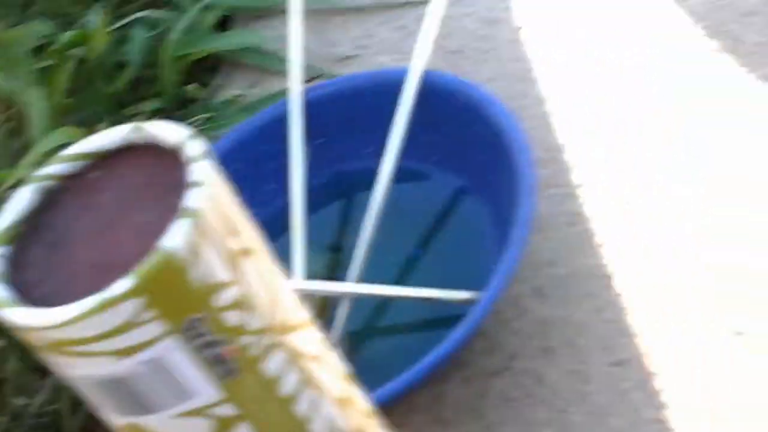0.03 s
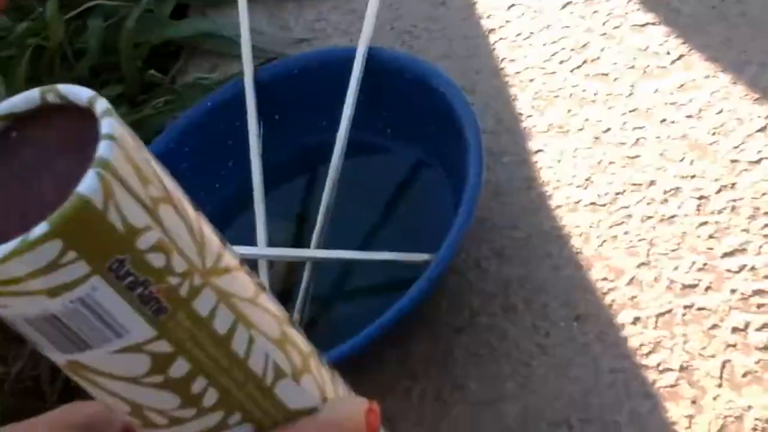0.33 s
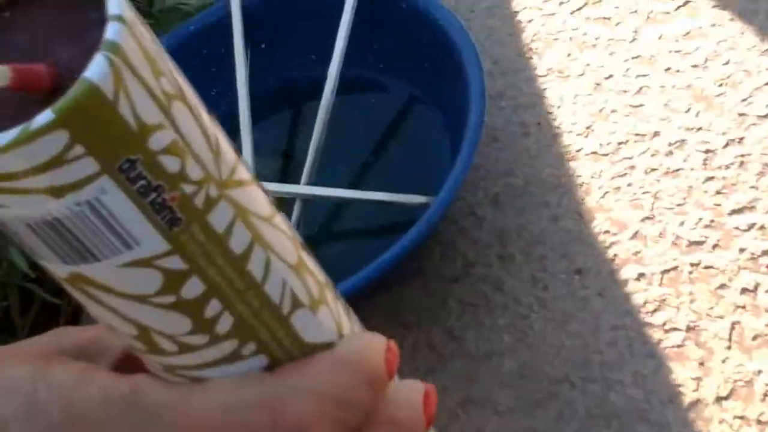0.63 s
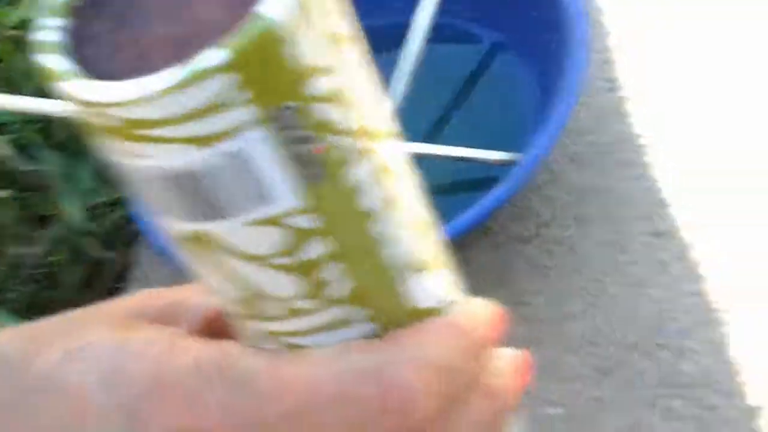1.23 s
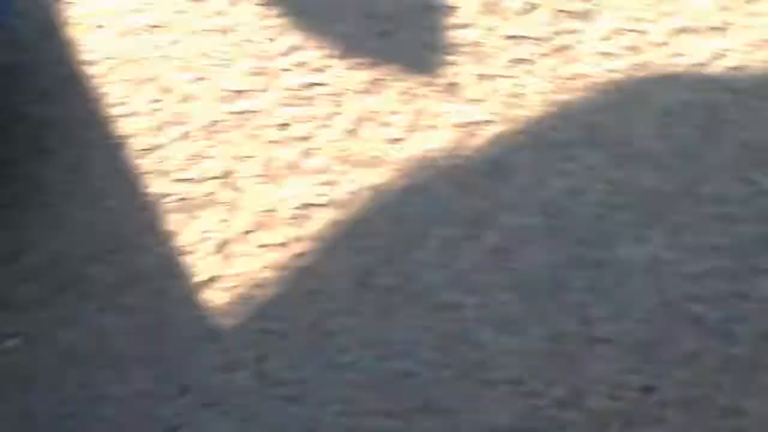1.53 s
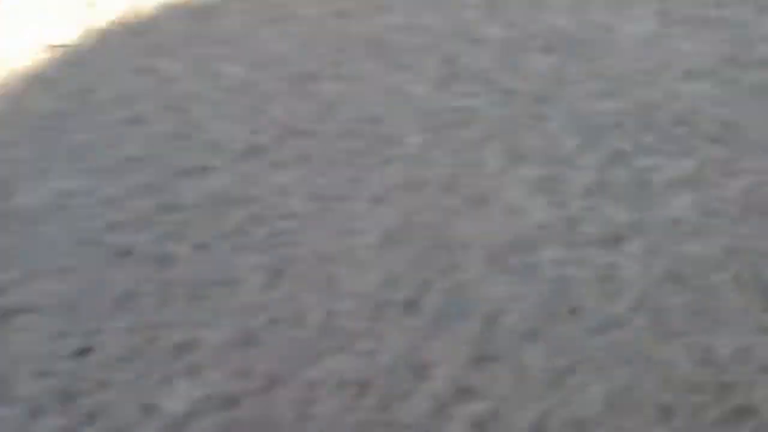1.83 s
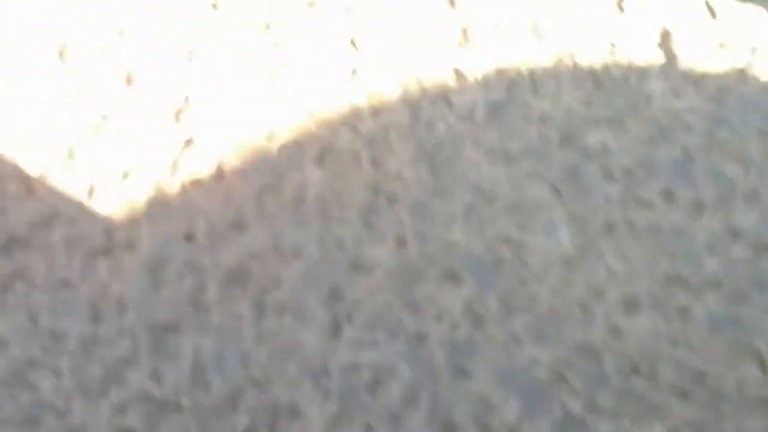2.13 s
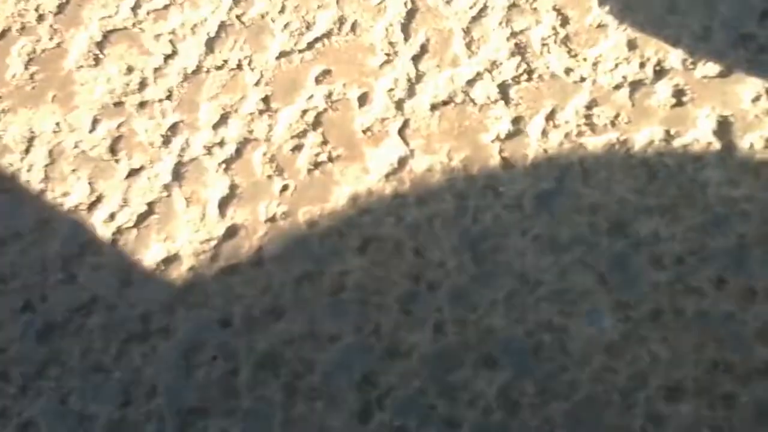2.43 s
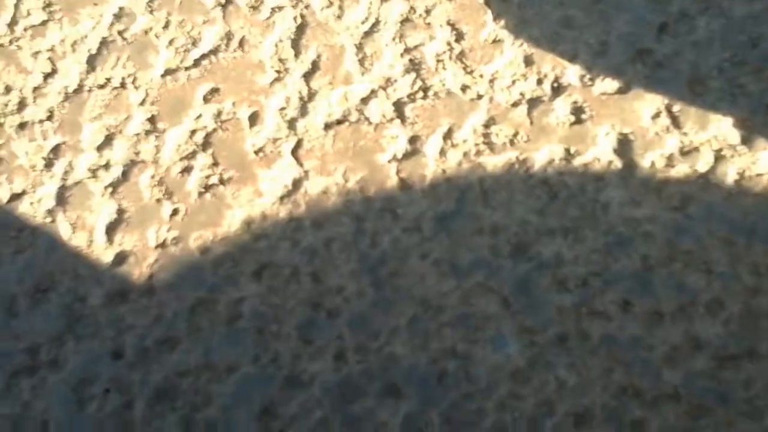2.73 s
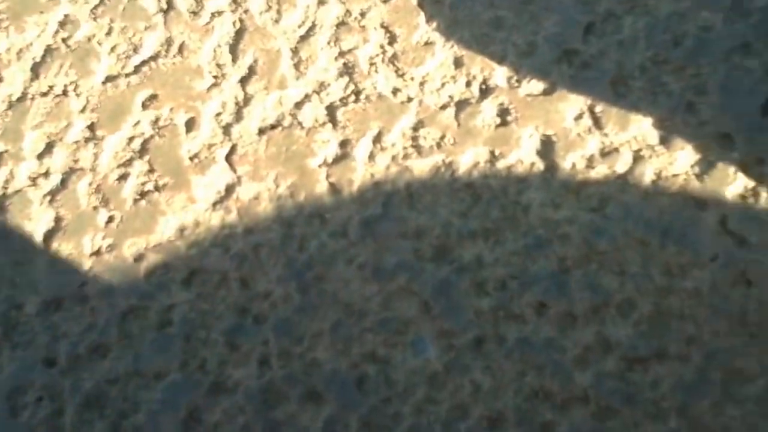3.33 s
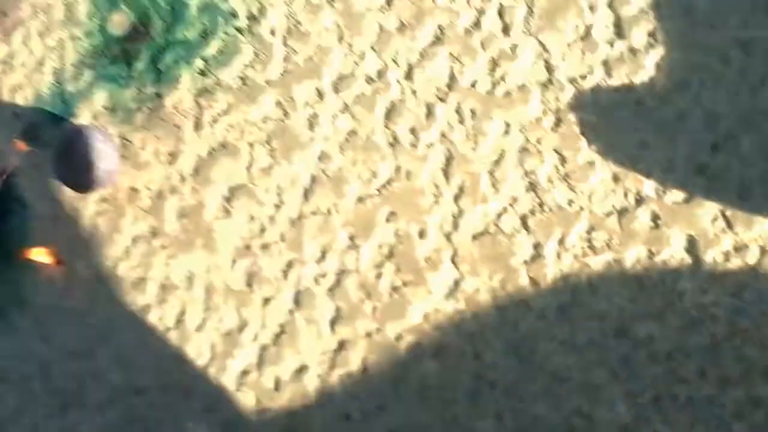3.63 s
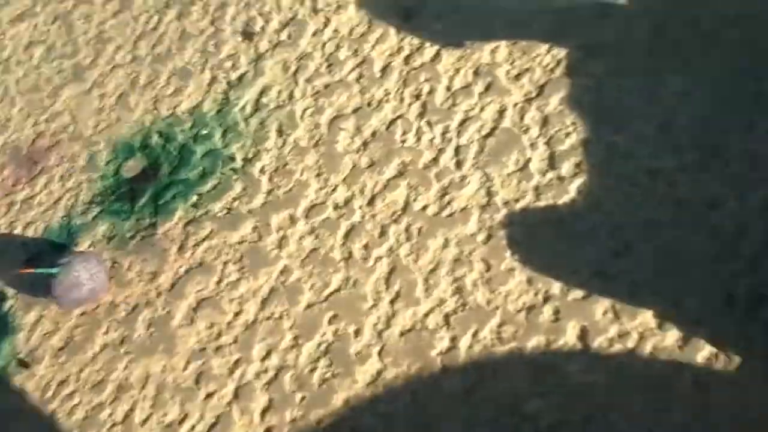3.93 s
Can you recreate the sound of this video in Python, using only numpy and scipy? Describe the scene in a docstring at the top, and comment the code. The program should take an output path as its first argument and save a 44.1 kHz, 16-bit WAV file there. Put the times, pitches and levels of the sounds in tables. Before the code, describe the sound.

A match is struck, then a smoke bomb fuse sputters and jets with a loud hiss.

```python
"""Lighting a smoke bomb

Outdoors on concrete, a match is scraped three times, flares, and is lowered hissing to a fuse.
The fuse catches and sputters, then the charge jets from its vent with two rough, sinking whistles.
A far engine drones and a far bird calls. The small microphone rings near 5 kHz, a peak that is
built into most of the noise spectra."""
import sys
import numpy as np
from scipy import signal
from scipy.fft import rfft, irfft
from scipy.io import wavfile
from scipy.ndimage import map_coordinates

SR = 44100
rng = np.random.default_rng(int(sys.argv[2]) if len(sys.argv) > 2 else 0)


def file_out(sig):
    """Save sig as 16-bit WAV at sys.argv[1]."""
    # one column per channel
    cols = np.atleast_2d(sig).T
    # limit, then scale
    lim = np.clip(cols, -1, 1)
    pcm = np.round(lim * 32767).astype(np.int16)
    wavfile.write(sys.argv[1], SR, pcm)


N = 176400
TIME = np.arange(N) / SR

# Spectra of the noises. Each row: frequency in Hz, relative spectral density in dB.
AIR_SPECTRUM = [(25, -59), (55, -13), (115, -9), (190, -11.5), (450, -21), (800, -22), (1300, -19.5),
                (2000, -27.5), (3200, -30.5), (4200, -25), (4950, -16.5), (6000, -29.5), (7700, -37.5),
                (14000, -45.5)]
RUMBLE_SPECTRUM = [(30, -48), (55, -0.5), (80, 2), (160, -3.5), (800, -50.5)]
STRIKER_SPECTRUM = [(300, -21), (800, -14.5), (1200, -13), (1500, -6), (2000, -11.5), (2450, -3.5),
                    (2780, -13), (3200, -5), (4000, -7), (4900, 4.5), (6500, -12.5), (10500, -23.5),
                    (14500, -22)]
SNAP_SPECTRUM = [(600, -24.5), (1100, -2.5), (2000, -18.5), (2400, -3.5), (2900, -14), (4700, 8),
                 (6300, -3.5), (9000, -15), (14500, -30)]
FLARE_SPECTRUM = [(1500, -12), (3800, -18), (4950, -2.5), (7300, -13.5), (14500, -15)]
FLAME_SPECTRUM = [(800, -15.5), (2200, -13), (3200, -9), (4200, -2), (4950, 5), (6000, -7), (7500, -14),
                  (11000, -19.5), (15000, -18)]
FUSE_SPECTRUM = [(120, -24), (230, -10), (400, -17.5), (700, -13), (1100, -20.5), (1600, -18.5),
                 (2750, -22), (3100, -15.5), (3900, -8), (4900, 4), (6000, -9.5), (7300, -21.5),
                 (14500, -20.5)]
SPRAY_SPECTRUM = [(3000, -16), (7000, 6.5), (9500, 8.5), (12200, 2), (14300, 6)]
JET_SPECTRUM = [(200, -23), (600, -20), (1100, -4), (1550, -14), (2150, -2), (2800, -9.5), (3300, -10.5),
                (3800, 3.5), (4600, -.5), (5400, 1), (6100, -10), (7000, -12.5), (8400, -22.5),
                (15000, -34)]
ROAR_SPECTRUM = [(150, -17.5), (400, -1.5), (1100, -4), (2200, -7), (3200, -12), (6000, -27.5)]

# Envelopes of the sources. Each row: time in seconds, level in dB.
AIR_LEVEL = [(1.8, -41), (2.8, -39.5)]
RUMBLE_LEVEL = [(0, -35.5), (.2, -52), (.4, -37), (.55, -56), (1.0, -46), (1.25, -41.5), (1.55, -46),
                (1.7, -52.5), (4.0, -47.5)]
ENGINE_THIRD_LEVEL = [(0, -45), (.9, -40.5), (2.6, -43), (2.8, -57), (3.03, -37), (3.3, -49), (3.6, -36),
                      (3.9, -47.5)]  # the strongest harmonic
FLARE_LEVEL = [(1.19, -35), (1.215, -40), (1.25, -30), (1.285, -67)]
FLAME_LEVEL = [(1.2, -62), (1.26, -37), (1.35, -44.5), (1.54, -44), (1.7, -41), (1.95, -38.5),
               (2.16, -39.5), (2.26, -34), (2.37, -37.5), (2.44, -39.5), (2.5, -53), (2.85, -55),
               (3.0, -44.5), (3.12, -62)]
FUSE_LEVEL = [(3.112, -65), (3.121, -34), (3.136, -21), (3.17, -23.5), (3.212, -17.5), (3.29, -20),
              (3.345, -19.5), (3.40, -21), (3.445, -24.5), (3.51, -22.5), (3.58, -20), (3.64, -23.5),
              (3.7, -23), (3.78, -23), (4.0, -26.5)]
SPRAY_LEVEL = [(3.112, -58), (3.135, -34), (3.37, -33), (3.44, -38), (3.68, -46), (3.755, -24.5),
               (3.8, -33), (4.0, -51)]
ROAR_LEVEL = [(3.15, -64), (3.3, -41), (3.68, -34), (3.72, -28.5), (3.765, -25.5), (3.81, -37), (3.92, -34),
              (3.99, -21)]

# Brief tones. Each row: start in seconds, length in seconds, pitch in Hz, level in dB.
HUM_SWELL = [(1.06, .15, 160, -37)]
BIRD_CALLS = [(1.99, 0.1, 1390, -47), (2.19, 0.1, 1405, -43), (2.37, 0.12, 1314, -44.5)]
SQUEAKS = [(.17, 0.048, 2336, -41.5), (3.698, 0.028, 1194, -30)]  # of the match and of the opening vent

# Upper engine harmonics. Each row: multiple of the firing rate, level in dB.
ENGINE_HARMONICS = [(4, -48.5), (6, -52)]
# The match head drags on the striker. Each row: start in seconds, length in seconds, level in dB.
SCRAPES = [(.008, 0.13, -41), (.063, 0.0073, -30), (0.165, 0.022, -33.5), (0.184, 0.025, -41),
           (0.712, 0.051, -44), (0.83, 0.016, -36.5), (0.845, 0.016, -33), (0.8974, 0.012, -19),
           (1.1435, .011, -23.5), (1.139, 0.0516, -26), (1.16, 0.017, -23)]
# The head snaps free. Each row: start in seconds, level in dB, decay in seconds.
SNAPS = [(0.0366, -29, 0.001), (0.0471, -24.5, 0.002), (0.0679, -15, 0.0018), (0.1773, -23, 0.00057),
         (0.9025, -9, 0.00056), (0.9047, -11, 0.0012), (1.1829, -10, 0.0019), (1.271, -22, 0.0008)]
# The hand knocks the box; the first, higher row is the ring of a match-head snap. Each row: start in seconds,
# pitch in Hz, level in dB, decay in seconds.
KNOCKS = [(0.0358, 984, -21.5, 0.0025), (0.084, 90.5, -29, 0.016), (0.286, 114, -28, 0.018),
          (0.379, 93.5, -33.5, 0.049), (1.521, 75, -33.5, .02)]
# The flame's echo off the nearest surface. Each row: time in seconds, mean lag in ms.
ECHO_LAG = [(1.25, 0.23), (1.42, 0.35), (1.6, 0.63), (1.9, 0.99), (2.08, 0.81), (2.25, 0.39), (2.42, 0.26)]
# First sparks at the fuse tip. Each row: start in seconds, level in dB.
SPARKS = [(2.7049, -32.5), (2.9217, -33), (2.995, -28.5), (3.0696, -30)]
# The vent's jet. Each row: time in seconds, rush level in dB, whistle level in dB, pitch in Hz.
JET = [(3.712, -33, -60, 3984), (3.758, -14.5, -24, 3925), (3.778, -17, -27, 3830),
       (3.795, -13, -18.5, 3837), (3.822, -18.5, -13, 3717), (3.831, -16.5, -24, 3786),
       (3.86, -15.5, -16, 3740), (3.9, -14.5, -22.5, 3717), (3.95, -17, -24, 3660), (4.0, -22, -35, 3650)]
# The vent's whistles. Each row: multiple of the pitch, width in Hz, relative level in dB.
WHISTLES = [(1, 85, 0), (1.415, 100, -2)]


def amp(db):
    """Amplitude grows tenfold for every 20 dB."""
    return 10 ** (np.asarray(db) / 20)


def unit(x):
    """Normalisation to an rms of 1."""
    return x / np.sqrt(np.mean(x ** 2) + 1e-20)


def curve(rows, column=1):
    """Linear interpolation of one table column over time."""
    rows = np.array(rows)
    return np.interp(TIME, rows[:, 0], rows[:, column])


def level(rows, column=1):
    """An amplitude envelope from a curve in dB, silent before its first point."""
    return amp(curve(rows, column)) * (TIME >= rows[0][0])


def colour(x, spectrum):
    """A minimum-phase filter imposes the spectrum; white noise keeps its power."""
    hz, db = np.transpose(spectrum)
    size = 4096
    bin_hz = np.fft.rfftfreq(size, 1 / SR)
    gain = unit(amp(np.interp(np.log(bin_hz + 1), np.log(hz), db)))
    log_gain = np.log(np.r_[gain, gain[-2:0:-1]])
    taps = np.fft.ifft(np.exp(np.conj(signal.hilbert(log_gain)))).real
    return signal.oaconvolve(x, taps[:size // 2])[:N]


def drift(rate_hz):
    """Low-passed noise wanders smoothly, with an rms of 1."""
    hz = np.fft.rfftfreq(N, 1 / SR)
    return unit(irfft(rfft(rng.standard_normal(N)) / (1 + (hz / rate_hz) ** 4), N))


def sputter(depth_db, rate_hz):
    """Random amplitude modulation breaks white noise into puffs."""
    return unit(rng.standard_normal(N) * amp(depth_db * np.clip(drift(rate_hz), -2.5, 2.5)))


def rough_tone(hz, width_hz, steady):
    """Narrow-band noise is heard as a rough tone; steady (0-1) evens out its fading."""
    envelope = drift(width_hz / 2) + 1j * drift(width_hz / 2)
    envelope /= (abs(envelope) + 1e-6) ** steady
    phase = 2 * np.pi * np.cumsum(hz * np.ones(N)) / SR
    return unit((envelope * np.exp(1j * phase)).real)


def chirps(rows, width_hz):
    """Rough tones swell and fade under half-sine envelopes."""
    return sum(amp(db) * np.sin(np.pi * np.clip((TIME - start) / length, 0, 1))
               * rough_tone(hz, width_hz, steady=0.17) for start, length, hz, db in rows)


def burst(start, decay):
    """Sudden excitation dies away exponentially."""
    return (TIME >= start) * np.exp(-np.maximum(TIME - start, 0) / decay)


def outdoor_air():
    """Broadband ambient noise lies over the low rumble of wind and handling."""
    air = amp(curve(AIR_LEVEL)) * colour(sputter(depth_db=0.7, rate_hz=26), AIR_SPECTRUM)
    rumble = level(RUMBLE_LEVEL) * colour(rng.standard_normal(N), RUMBLE_SPECTRUM)
    return air + rumble


def far_engine():
    """Periodic firing gives harmonics that sink as the engine slows; the hum swells briefly."""
    firing_hz = 41.29 - 0.2 * TIME
    harmonics = [(3, level(ENGINE_THIRD_LEVEL))] + [(k, amp(db)) for k, db in ENGINE_HARMONICS]
    drone = sum(gain * rough_tone(k * firing_hz, width_hz=3.04, steady=0.55) for k, gain in harmonics)
    return drone + chirps(HUM_SWELL, width_hz=10)


def far_bird():
    """Each call is a band of noise, narrow enough to carry a hoarse pitch."""
    return chirps(BIRD_CALLS, width_hz=210)


def match_strikes():
    """Stick-slip friction: the head catches on grit and snaps free. The knocked box rings briefly, and so does
    the first snap."""
    edge_s, crack_db = 0.0054, 11
    drag = sum(amp(db) * np.clip(np.minimum(TIME - start, start + length - TIME) / edge_s, 0, 1)
               for start, length, db in SCRAPES)
    grit = drag * sputter(depth_db=2.0, rate_hz=700)
    snaps = sum(amp(db) * burst(start, decay) for start, db, decay in SNAPS) * rng.choice([-1, 1], N)
    for start, db, _ in SNAPS:
        snaps[round(start * SR)] = amp(db + crack_db)  # a crack leads the crumbling
    knocks = sum(amp(db) * burst(start, decay) * np.sin(2 * np.pi * hz * (TIME - start))
                 for start, hz, db, decay in KNOCKS)
    return colour(grit, STRIKER_SPECTRUM) + colour(snaps, SNAP_SPECTRUM) + knocks


def match_flame():
    """Combustion flares, then hisses; interference with its echo sweeps the moving flame's hiss."""
    flare = level(FLARE_LEVEL) * colour(sputter(depth_db=1.8, rate_hz=400), FLARE_SPECTRUM)
    hiss = level(FLAME_LEVEL) * colour(sputter(depth_db=1.0, rate_hz=170), FLAME_SPECTRUM)
    hand_tremor, near_ms = 0.033, 0.45
    lag_ms = curve(ECHO_LAG) * (1 + hand_tremor * drift(rate_hz=15))
    echo = map_coordinates(hiss, [(TIME - lag_ms / 1000) * SR], order=3)
    echo_gain = 0.5 * np.minimum(1, near_ms / lag_ms) ** 2  # weaker far from the surface
    return flare + (hiss + echo_gain * echo) / np.hypot(1, echo_gain)


def fuse():
    """Powder burns unevenly: single sparks, then quick puffs under a fine spray of sparks."""
    sparks = sum(amp(db) * burst(start, decay=0.0016) for start, db in SPARKS) * rng.standard_normal(N)
    puffs = level(FUSE_LEVEL) * rng.standard_normal(N) * amp(1.4 * drift(rate_hz=41))
    spray = level(SPRAY_LEVEL) * sputter(depth_db=1.0, rate_hz=640)
    return colour(puffs + sparks, FUSE_SPECTRUM) + colour(spray + 0.25 * sparks, SPRAY_SPECTRUM)


def vent_jet():
    """Turbulent gas rushes and roars through the vent, whose two whistles sink as it burns wider."""
    rush = level(JET) * colour(sputter(depth_db=1.0, rate_hz=300), JET_SPECTRUM)
    roar = level(ROAR_LEVEL) * colour(sputter(depth_db=1.5, rate_hz=74), ROAR_SPECTRUM)
    pitch_hz = curve(JET, column=3)
    whistles = sum(amp(db) * rough_tone(ratio * pitch_hz, width_hz, steady=0.5)
                   for ratio, width_hz, db in WHISTLES)
    return rush + roar + level(JET, column=2) * whistles


def scene():
    """Superposition: the pressures of all sources add at one microphone."""
    foreground = match_strikes() + match_flame() + fuse() + vent_jet() + chirps(SQUEAKS, width_hz=126)
    return (foreground + outdoor_air() + far_engine() + far_bird())[None]


def record(dry):
    """Clipping at full scale limits the amplitude, then a low-pass filter limits the band."""
    cutoff_hz = 14950
    lowpass = signal.firwin(401, cutoff_hz, window=("kaiser", 9), fs=SR)
    return signal.oaconvolve(np.clip(dry, -1, 1), lowpass[None], "same")


dry = scene()
out = record(dry)
file_out(out)
```